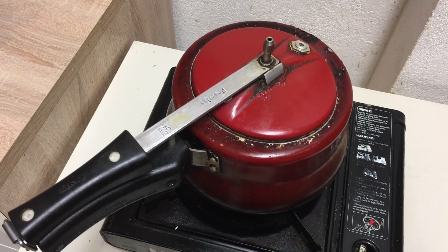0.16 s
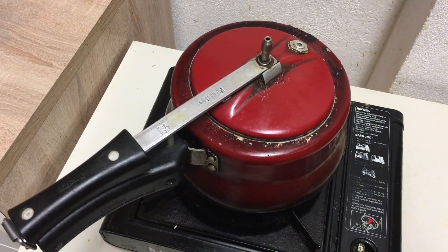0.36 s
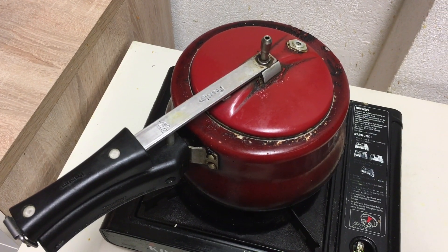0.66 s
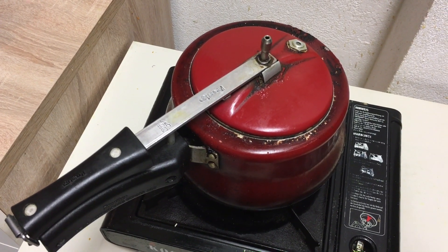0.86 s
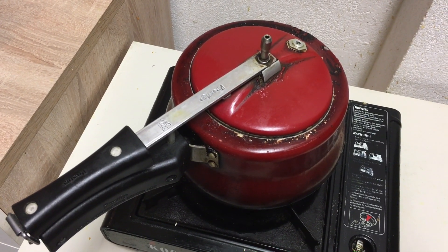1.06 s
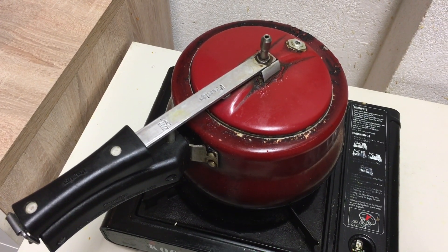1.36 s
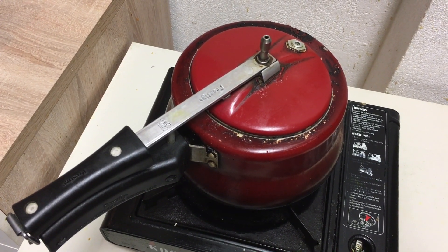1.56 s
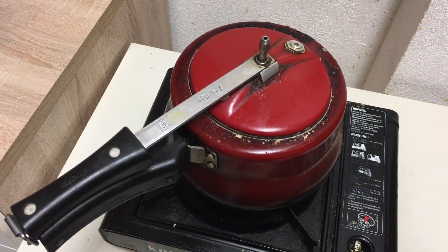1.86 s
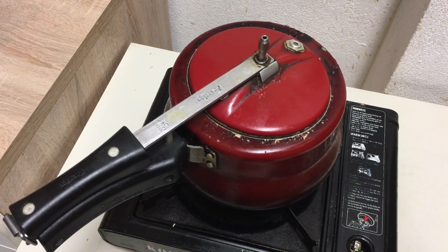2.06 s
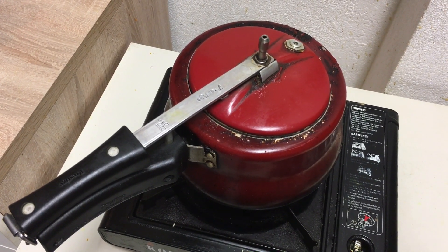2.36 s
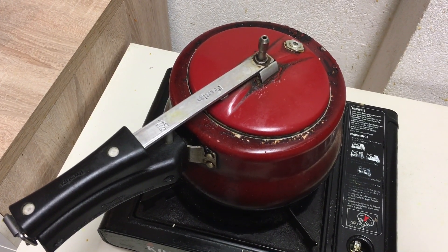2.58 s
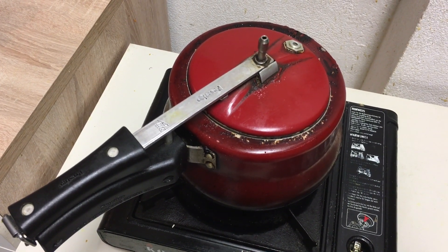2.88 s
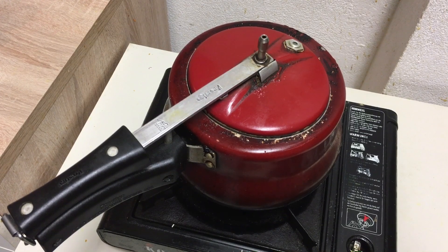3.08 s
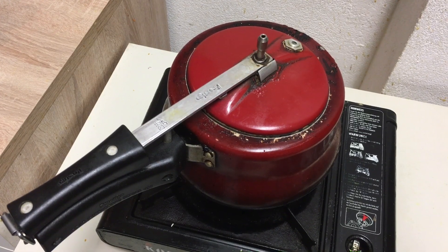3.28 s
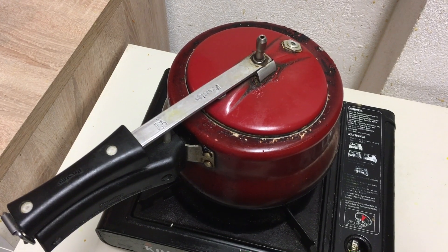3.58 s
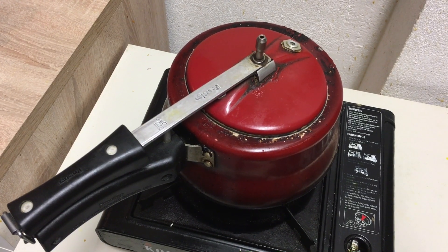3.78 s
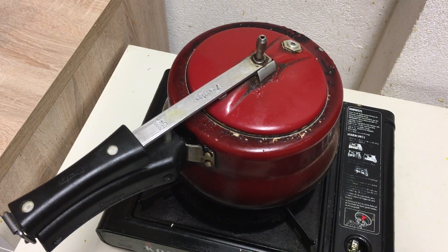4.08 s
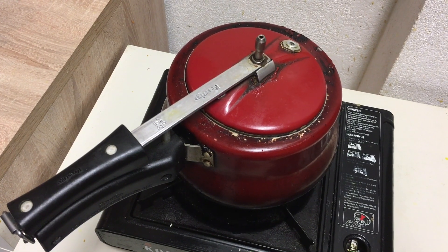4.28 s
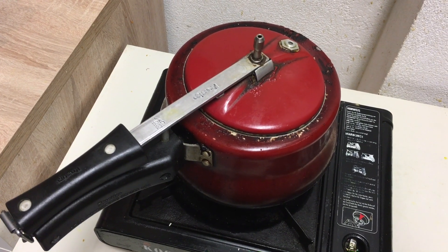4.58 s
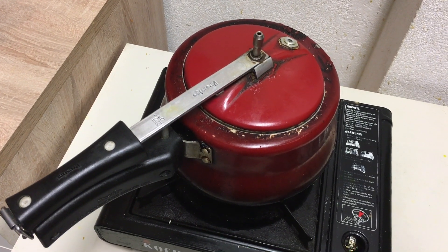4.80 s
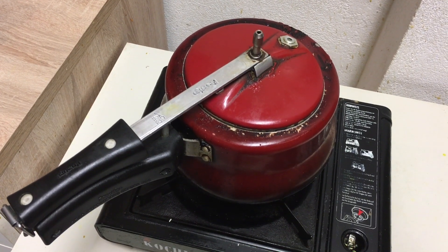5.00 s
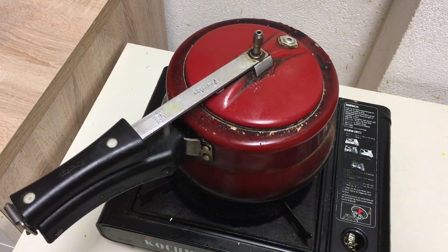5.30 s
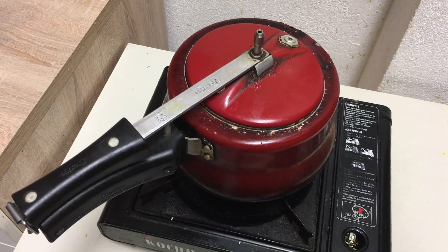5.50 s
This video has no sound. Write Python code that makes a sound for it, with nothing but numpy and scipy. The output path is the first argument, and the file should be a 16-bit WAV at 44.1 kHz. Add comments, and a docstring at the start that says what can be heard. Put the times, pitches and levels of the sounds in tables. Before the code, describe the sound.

Close mono sound from above a lidded pot in a small, lightly echoing kitchen. A faint gas flame hisses and rumbles throughout. Early kernel bursts snap and bounce off the metal with low soft thumps and dull taps; tiny high oil ticks fill the quieter middle; later pops return, one strong near four and a half seconds, then a loud tight flurry closes it.

```python
"""Popcorn pops in a closed pressure cooker on a portable gas stove in a small kitchen.
Each burst is a noisy crack coloured by the pot's resonances over its brief ring, with a low puff of steam.
Kernels ricochet off wall and lid, fragments rattle after each burst, and flakes land with dull taps.
Hot oil spits in tiny high sine ticks and hulls crackle in narrow bands of noise.
The burner hisses and rumbles steadily beneath, as noise shaped by the resonances of its jet."""
import sys
import numpy as np
from scipy import signal
from scipy.fft import rfft, irfft, next_fast_len
from scipy.io import wavfile
from scipy.ndimage import map_coordinates

SR = 44100
rng = np.random.default_rng(int(sys.argv[2]) if len(sys.argv) > 2 else 0)


def file_out(sig):
    """Save sig as 16-bit WAV at sys.argv[1]."""
    # one column per channel
    cols = np.atleast_2d(sig).T
    # limit, then scale
    lim = np.clip(cols, -1, 1)
    pcm = np.round(lim * 32767).astype(np.int16)
    wavfile.write(sys.argv[1], SR, pcm)


N = 249165  # length of the scene in samples


def amp(db):
    """Decibels to gain."""
    return 10 ** (np.asarray(db) / 20)


def unit(x):
    """Scale to rms 1."""
    return x / np.sqrt(np.mean(x ** 2) + 1e-20)


def along(points, hz):
    """Read a curve of (Hz, value) points on a logarithmic frequency axis."""
    f, values = np.transpose(points)
    return np.interp(np.log(hz + 1), np.log(f), values)


def add(track, s, sound):
    """Mix a sound into the track at s seconds."""
    i = max(round(s * SR), 0)
    track[i:i + len(sound)] += sound[:max(len(track) - i, 0)]


def filtered(x, gain):
    """Multiply the spectrum of x by a gain that depends on frequency."""
    m = next_fast_len(len(x) + 8192)
    return irfft(rfft(x, m) * gain(np.fft.rfftfreq(m, 1 / SR)), m)[:len(x)]


def coloured(x, level):
    """Causal filter with a dB curve of frequency, so that attacks stay sharp."""
    m = 2 * next_fast_len(len(x) // 2 + 1024)
    cepstrum = irfft(np.log(amp(level(np.fft.rfftfreq(m, 1 / SR)))), m)
    # folding the cepstrum forward in time gives minimum phase
    cepstrum[1:m // 2] *= 2
    cepstrum[m // 2 + 1:] = 0
    return irfft(rfft(x, m) * np.exp(rfft(cepstrum)), m)[:len(x)]


def fade(t, t60):
    """Exponential decay by 60 dB in t60 seconds."""
    return np.exp(-np.log(1000) * t / t60)


def wobble(rate):
    """A smooth random curve with rate knots a second."""
    knots = rng.standard_normal(int(N * rate / SR) + 4)
    return map_coordinates(knots, [np.arange(N) * rate / SR])


# Colour of the gas noise. Each row: frequency in Hz, relative density in dB per Hz.
BURNER_COLOUR = [(20, 6.5), (50, 4.5), (100, 6.5), (200, 1), (300, -10), (500, -12), (1100, -17),
                 (2000, -15), (4000, -13), (6000, -14.5), (8000, -11.5), (10400, -13.5), (12500, -11.5),
                 (15800, -14.5)]
# Resonances in rumble and hiss. Each row: frequency in Hz, width in Hz, lift in dB.
JET_RESONANCES = [(86.6, 13.4, 4), (185.9, 2.8, 14.5), (269.3, 15, 10), (306.2, 32, 12.5), (411.2, 16, 11),
                  (1436, 280, 4), (1909, 53, 11), (2530, 27, 8), (2820, 20, 12), (3012, 140, 10.5),
                  (4857, 96, 13), (5075, 110, 9), (5374, 140, 9), (5725, 95, 14), (6745, 23, 14),
                  (6850, 130, 9), (7130, 69, 13), (8400, 200, 6)]
# Slow drift of the flame. Each row: time in seconds, rumble gain in dB.
FLAME_DRIFT = [(0, 0.5), (.8, -0.5), (1.4, 0), (2.1, 0), (2.6, -1.5), (3.4, -2), (4.4, 0.5), (5.1, -1.5),
               (5.65, -2)]


def burner(level_db=-49.0, rumble_flutter_db=-1.2, hiss_flutter_db=.7, rumble_top_hz=350):
    """Turbulent gas is noise through the jet's resonances; the flame's rumble and hiss flutter apart."""
    def gas_gain(f):
        peaks_db = sum(db / (1 + (2 * (f - hz) / width) ** 2) for hz, width, db in JET_RESONANCES)
        return amp(along(BURNER_COLOUR, f) + peaks_db)

    gas = unit(filtered(rng.standard_normal(N), gas_gain))
    rumble = filtered(gas, lambda f: 1 / (1 + (f / rumble_top_hz) ** 4))
    hiss = gas - rumble
    drift_db = np.interp(np.arange(N) / SR, *np.transpose(FLAME_DRIFT))
    rumble_db = drift_db + rumble_flutter_db * wobble(7.3)
    hiss_db = hiss_flutter_db * wobble(11)
    return amp(level_db) * (hiss * amp(hiss_db) + rumble * amp(rumble_db))


# Decay of the small kitchen. Each row: frequency in Hz, t60 in seconds.
KITCHEN_DECAY = [(200, 0.53), (1100, 0.57), (3000, 0.35), (8000, 0.33), (15000, 0.15)]


def room_tail(t, build):
    """Diffuse echo of the kitchen: it builds up over build seconds, then the treble dies first."""
    hz, frames, z = signal.stft(rng.standard_normal(len(t)), SR, nperseg=256)
    decay = fade(frames, along(KITCHEN_DECAY, hz)[:, None])
    tail = signal.istft(z * decay, SR, nperseg=256)[1]
    return tail[:len(t)] * (1 - np.exp(-t / build))


def tick(hz, swell=0.00015):
    """A bursting droplet is a few cycles of a very high note that swells in swell seconds and dies."""
    t = np.arange(SR // 200) / SR
    return t / swell * np.exp(1 - t / swell) * np.sin(2 * np.pi * hz * t)


def droplets(count, start, length, db, spread_db):
    """Rows (s, dB) of droplets that burst at random within a stretch of time."""
    return [(start + length * when, db + spread_db * (2 * size - 1))
            for when, size in rng.random((count, 2))]


SPIT_HZ = 12500  # middle note of the bursting droplets
SIZZLE_DB = -43  # middle level of the finest droplets, before the echo
# the oil boils up once in a flurry, centred on this time; its level is ahead of the common spit gain
FLURRY_S, FLURRY_LENGTH_S, FLURRY_DB = 2.51, .32, -46
# The loudest droplets spitting in the oil. Each row: start in seconds, relative level in dB.
SPITS = [(0.0552, -38.5), (0.907, -40), (1.5941, -35.5), (2.3825, -41), (2.4347, -38), (2.4779, -38),
         (2.513, -37), (2.5394, -34), (2.631, -35), (3.0528, -36.5), (3.3, -30), (3.4082, -38),
         (3.552, -34), (3.6579, -32.5), (4.011, -39), (4.781, -43), (5.2308, -34.5)]


def oil(spit_db=13, stray_db=-44, spread_db=4, pitch_spread=0.093, near_db=-27, near_t60=0.047,
        room_db=-38, count=260):
    """Droplets spit singly, in one flurry and in a fine random sizzle, scattered by the lid and the room."""
    out, t = np.zeros(N), np.arange(SR // 4) / SR
    flurry = droplets(14, FLURRY_S - FLURRY_LENGTH_S / 2, FLURRY_LENGTH_S, FLURRY_DB, spread_db)
    strays = droplets(12, 0, N / SR, stray_db, spread_db)
    for s, db in SPITS + flurry + strays:
        hz = SPIT_HZ * np.exp(pitch_spread * rng.standard_normal())
        add(out, s, amp(db + spit_db) * tick(hz))

    times = rng.uniform(0, N / SR, count)
    for s, size, pitch in zip(times, rng.standard_normal(count), rng.standard_normal(count)):
        db = SIZZLE_DB + spread_db * np.tanh(size)
        add(out, s, amp(db) * tick(SPIT_HZ * np.exp(.12 * pitch)))

    near = amp(near_db) * rng.standard_normal(len(t)) * fade(t, near_t60)
    room = amp(room_db) * room_tail(t, build=0.011)
    return out + signal.fftconvolve(out, near + room)[:N]


# The clearest crackles of hot hulls. Each row: start in seconds, level in dB, pitch in Hz.
CRACKLES = [(1.605, -46.5, 4300), (1.65, -40.5, 9400), (1.743, -46, 4570), (1.991, -42, 7500),
            (2.497, -43.5, 3600), (2.583, -47.5, 2580), (4.306, -42, 7300)]


def hulls(level_db=-53, spread_db=3, pitch_hz=6200, t60=0.063, count=70):
    """Hot hulls crackle faintly, each a fading band of noise at its own pitch."""
    out, t = np.zeros(N), np.arange(SR // 16) / SR
    times = rng.uniform(0, N / SR, count)
    faint = [(s, level_db + spread_db * np.tanh(size), pitch_hz * np.exp(.35 * pitch))
             for s, size, pitch in zip(times, rng.standard_normal(count), rng.standard_normal(count))]
    for s, db, centre in CRACKLES + faint:
        noise = rng.standard_normal(len(t))
        band = unit(filtered(noise, lambda hz: 1 / (1 + ((hz / centre - 1) / 0.1) ** 2)))
        add(out, s, amp(db) * band * fade(t, t60))
    return out


# Modes of the closed pot, its air, wall and lid.
# Each row: frequency in Hz, relative level in dB, t60 in seconds.
POT_MODES = [(697, -3, 0.082), (720, -9, 0.18), (1071, -7.5, 0.12), (1409.6, 6.5, 0.15), (1862, -2, 0.31),
             (2033, -6, 0.067), (2284, -9.5, 0.24), (2482, 5.5, 0.11), (3198, 2.5, 0.053),
             (3470, -17.5, 0.052), (3810, -6, 0.17), (3937, -3.5, 0.24), (4477, 2, 0.092),
             (4960, -26, 0.57), (5300, -1.5, 0.16), (5600, -3.5, 0.15), (5940, -18, 0.14), (6240, -5, 0.2),
             (6860, -10.5, 0.16), (7430, -13, 0.18), (8380, -12.5, 0.33), (9300, -9, 0.22),
             (9970, 0, 0.087), (10960, -4, 0.19), (11600, -13, 0.082)]


def resonances(f, spot_db, width=0.0099, valley=0.0034, lift_db=6, overlap_hz=7500):
    """The pot's peaks and valleys in dB; in the treble the modes overlap and even out."""
    hz, db, _ = np.transpose(POT_MODES)[:, :, None]
    peaks = amp(db + spot_db) ** 2 / (1 + (2 * (f - hz) / (width * hz)) ** 2)
    power = valley + np.sum(peaks, axis=0)
    return (10 * np.log10(power) + lift_db) / (1 + (f / overlap_hz) ** 4)


# Colour that every strike takes on through the pot. Each row: frequency in Hz, gain in dB.
SHELL_COLOUR = [(100, 13), (350, -14.5), (520, -4), (680, -4.5), (950, 1), (1400, -0.5), (2400, 0),
                (3400, 1.5), (5000, -1), (7000, -0.5), (9700, 0), (10400, -9), (11800, 2), (14000, -5),
                (16000, -4.5)]


def strike(force, hollow, ring_db, hold=0.0018, crack_t60=0.065, treble_t60=0.022, treble_db=2,
           split_hz=7000, room_db=-12, damped_db=10, spot_db=1.5, detune=0.00333):
    """A blow with a force spectrum (dB of Hz): a crack that rattles round the pot, the room and a ring."""
    t = np.arange(SR * 3 // 10) / SR
    white = rng.standard_normal(len(t))
    body = signal.sosfilt(signal.butter(2, split_hz, fs=SR, output="sos"), white)
    treble = signal.sosfilt(signal.butter(2, split_hz, "high", fs=SR, output="sos"), white)
    # full strength for hold seconds, then the corn inside soaks up the treble first
    late = np.maximum(t - hold, 0)
    crack = body * fade(late, crack_t60) - amp(treble_db) * treble * fade(late, treble_t60)

    # every spot in the pot excites the modes at other strengths
    spot, shift, side = rng.standard_normal((3, len(POT_MODES), 1))

    def colour(hz):
        return force(hz) + along(SHELL_COLOUR, hz) + hollow * resonances(hz, spot_db * spot)

    noise = coloured(crack + amp(room_db) * room_tail(t, build=0.00093), colour)
    hz, db, t60 = np.transpose(POT_MODES)[:, :, None]
    strength = amp(db + force(hz) + spot_db * spot) * np.sign(side)
    modes = strength * np.sin(2 * np.pi * hz * (1 + detune * shift) * t) * fade(t, t60)
    return noise + amp(ring_db - damped_db * (1 - hollow)) * modes.sum(axis=0)


KNOCK_HZ = 794  # the low knock of a blow, weak because a kernel is so light
# A harder contact tilts a blow's force towards the treble.
# The one row: lowest, pivot and highest frequency of the tilt, in Hz.
TILT_HZ = (2040, 5100, 12100)


def blow(db, tilt, hollow, knock_db):
    """A kernel's blow: its force is a tilted line that leads down to the low knock."""
    low, pivot, high = TILT_HZ

    def force(hz):
        slope_db = tilt * np.log2(np.clip(hz, low, high) / pivot)
        return db + slope_db + along([(KNOCK_HZ, knock_db), (low, 0)], hz)

    return strike(force, np.clip(hollow, 0, 1), ring_db=-21.0)


# Kernels bursting. Each row: start in seconds, relative level in dB, tilt in dB per octave,
# hollow from 0 to 1, low knock in dB, relative level of the puff of steam in dB.
# Hollow 1 is in mid-pot, heard through the pot's resonances; 0 is hard and broad, straight on the metal.
POPS = [(0.1472, -23, -3.5, 0.73, -5, -37), (0.261, -14.5, -8, 0.57, -2.5, -49),
        (0.597, -24, -3, 0.85, -38, -46), (0.6634, -12, -5, 0.57, -16, -46.5),
        (1.0438, -19.5, 2.5, 0.8, 0, -43), (3.593, -22.5, -1, 1, -12, -48.5),
        (3.8864, -16.5, -5.5, 0.73, -22.5, -47.5), (4.1356, -14, 4.5, 1, -3.5, -39),
        (4.5487, -8, -1.5, 0.48, -8.5, -38), (5.293, -20.5, -6.5, 1, -30, -45.5),
        (5.389, -15.5, -1, 0.88, -17.5, -50.5), (5.4624, -14.5, -6.5, 0.53, -17.5, -41.5)]
# Flying kernels hitting wall and lid.
# Each row: start in seconds, relative level in dB, tilt in dB per octave, hollow from 0 to 1.
RICOCHETS = [(0.1527, -16, 2, 0.6), (0.163, -23.5, 0.5, 0.5), (0.189, -27.5, -3.5, 1),
             (0.214, -32.5, 4, .7), (0.2282, -28, 1.5, 0.8), (0.2496, -29.5, -3, 1),
             (0.2766, -19.5, 7, 0.96), (0.2918, -27, 7.5, .9), (0.385, -33, -8, 0.3), (0.438, -35, 3.5, 1),
             (0.603, -10.5, 1.5, 0.82), (0.6722, -13, 2, 0.8), (0.69, -23, 5, 0.8),
             (0.804, -29, -3.5, 0.37), (0.943, -34.5, -2, 0.76), (1.064, -27, -4.5, 1),
             (1.2483, -36, 3.5, 0.64), (3.603, -22.5, -7.5, 0.6), (3.64, -43, -12.5, 0.6),
             (3.8285, -25.5, 1, 0.8), (4.068, -36.5, -4, .85), (4.143, -15.5, 0, 0.92),
             (4.17, -25, -2.5, 0.5), (4.489, -20.5, -2, 0.33), (4.5116, -13.5, 5, 0.74),
             (5.3017, -14.5, 1, 0.77), (5.3719, -23.5, -0.5, 1), (5.471, -22, -3, 0.8),
             (5.482, -15, 0.5, 0.65), (5.4954, -5, -0.5, 0.39), (5.56, -21, 4, 0)]


def kernels(ricochet_knock_db=-12, hard_knock_db=-1):
    """Kernels burst and ricochet; the harder and brighter a ricochet, the less it knocks."""
    out = np.zeros(N)
    for s, db, tilt, hollow, knock_db, _ in POPS:
        add(out, s, blow(db, tilt, hollow, knock_db))
    for s, db, tilt, hollow in RICOCHETS:
        knock_db = ricochet_knock_db + hard_knock_db * max(tilt, 0)
        add(out, s, blow(db, tilt, hollow, knock_db))
    return out


# Low resonances of the cooker on its stove and of the corner it stands in.
# Each row: frequency in Hz, relative level in dB, t60 in seconds.
BOOM_MODES = [(55, -41, 0.049), (85, 9, 0.07), (89.3, -14.5, 1), (117.7, 5, 0.16), (132.8, -4.5, 0.4),
              (176, -3.5, 0.36), (250.4, -4, 0.11)]


def puffs(level_db=3, rise=0.0026, lag=0.0034):
    """The sudden steam of each burst gives the cooker one soft, low shove."""
    out, t = np.zeros(N), np.arange(SR * 2 // 3) / SR
    boom = sum(amp(db) * np.sin(2 * np.pi * hz * t) * fade(t, t60) for hz, db, t60 in BOOM_MODES)
    shove = -boom * (1 - np.exp(-t / rise))
    for s, *_, db in POPS:
        add(out, s + lag, amp(db + level_db) * shove)
    return out


# bits of hull rattle round the pot after every burst, on average ever more weakly; level relative to the pop
RATTLE_FROM_S, RATTLE_FOR_S, RATTLE_DB, RATTLE_LOSS_DB_PER_S = .012, .08, -20.5, 138
RATTLE_HOLLOW = .5  # 0-1: so light, they only half wake the pot's resonances


def rattle(tilt=1, knock_db=-10, spread_db=3, count=4):
    """A few light fragments hit the metal just after each burst, losing energy as they fly."""
    out = np.zeros(N)
    for s, db, *_ in POPS:
        hit = blow(db + RATTLE_DB, tilt, RATTLE_HOLLOW, knock_db)
        for when, size in rng.random((count, 2)):
            flight = RATTLE_FOR_S * when
            hit_db = spread_db * (2 * size - 2.5) - RATTLE_LOSS_DB_PER_S * flight
            add(out, s + RATTLE_FROM_S + flight, amp(hit_db) * hit)
    return out


# after every pop the heap settles with a faint tap: earliest delay, its spread, middle level and pitch
SETTLE_FROM_S, SETTLE_FOR_S, SETTLE_DB, SETTLE_HZ = .07, .15, -39, 1700


def settling(spread_db=3, spread_octaves=0.92, count=1):
    """Rows (s, relative dB, Hz) of the faint tap that follows each pop."""
    rows = []
    for s, *_ in POPS:
        for when, size, pitch in rng.random((count, 3)):
            db = SETTLE_DB + spread_db * (2 * size - 1)
            hz = SETTLE_HZ * 2 ** (spread_octaves * (2 * pitch - 1))
            rows.append((s + SETTLE_FROM_S + SETTLE_FOR_S * when, db, hz))
    return rows


# Popped flakes landing softly on the base or against the wall, each with a dull tap.
# Each row: start in seconds, relative level in dB, pitch in Hz.
TAPS = [(0.336, -21.5, 2820), (0.344, -14, 700), (0.384, -16.5, 1970), (0.468, -28.5, 750),
        (0.536, -31.5, 1870), (0.804, -21, 2070), (1.438, -34, 1110), (4.251, -27.5, 2000),
        (4.339, -33, 2060), (4.58, -20, 710), (4.705, -33, 1090), (4.73, -29, 760), (5.505, -31, 730),
        (5.525, -18, 2200), (5.541, -15.5, 1950), (5.558, -19, 740), (5.61, -22, 2080)]


def tumbles(level_db=2, octaves=0.51, skirt_db=30, hollow=0.52, ring_db=-15):
    """Light, soft flakes land with a narrow, dull tap that rings the nearest modes most."""
    out = np.zeros(N)
    for s, db, pitch in TAPS + settling():
        def force(hz):
            distance = np.log2((hz + 1) / pitch) / octaves
            return db + level_db - skirt_db * np.tanh(distance ** 2)

        add(out, s, strike(force, hollow, ring_db))
    return out


def scene():
    """The cooker on its flame, heard from just above, as one channel."""
    corn = kernels() + rattle() + tumbles() + puffs()
    return (corn + oil() + hulls() + burner())[None]


TOP_HZ = 15900  # band limit of the microphone


def record(dry):
    """The microphone rounds off the very loudest peaks and keeps almost nothing above its band limit."""
    rounded = dry / (1 + (dry / .9) ** 6) ** (1 / 6)
    return np.array([filtered(channel, lambda hz: 1 / (1 + (hz / TOP_HZ) ** 160)) for channel in rounded])


dry = scene()
out = record(dry)
file_out(out)
```